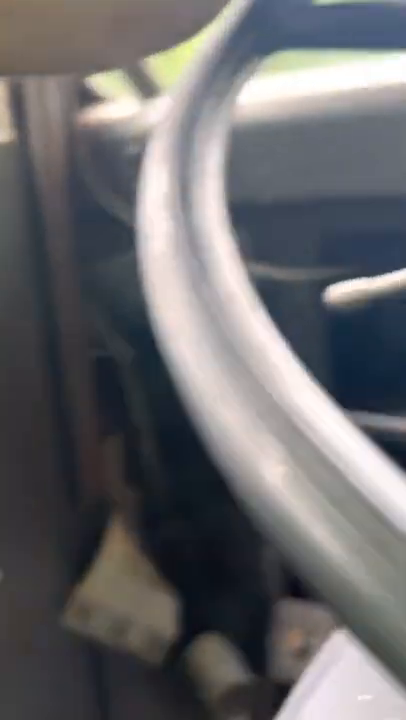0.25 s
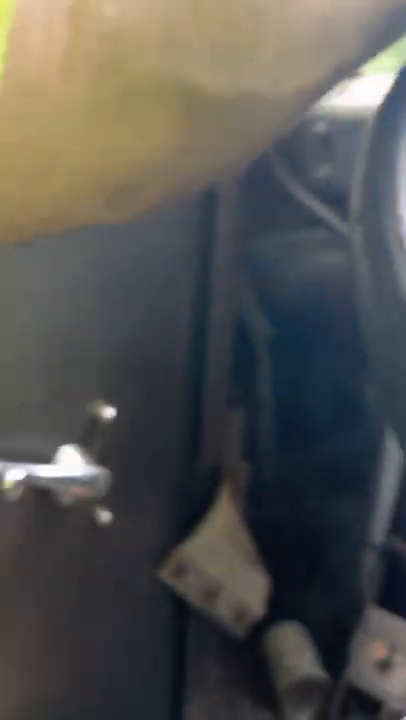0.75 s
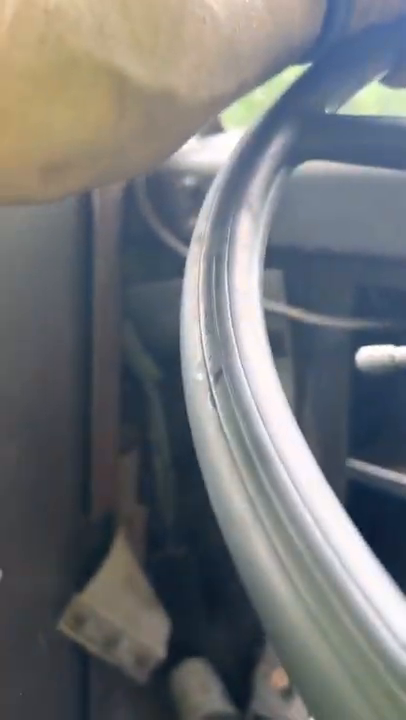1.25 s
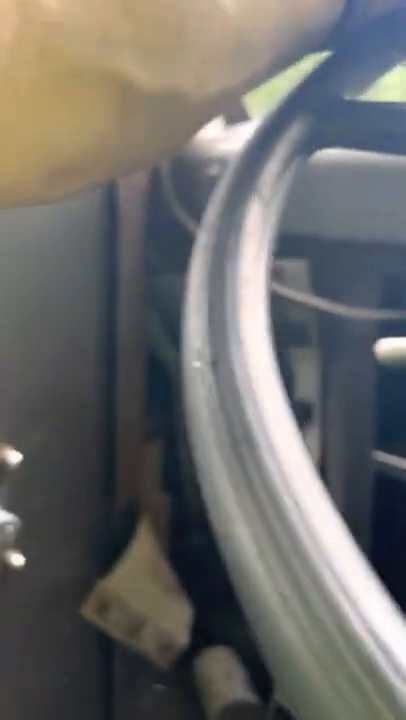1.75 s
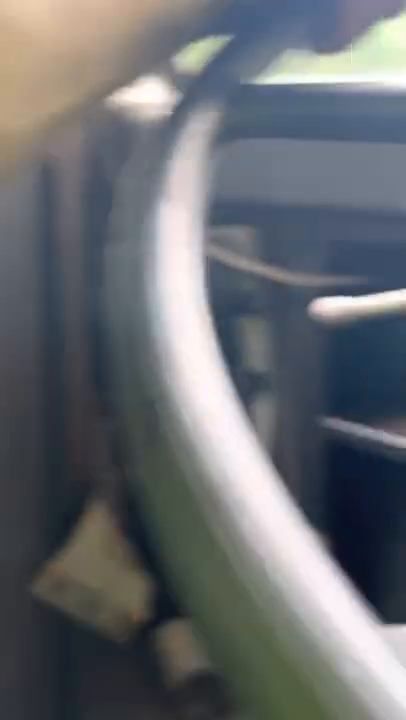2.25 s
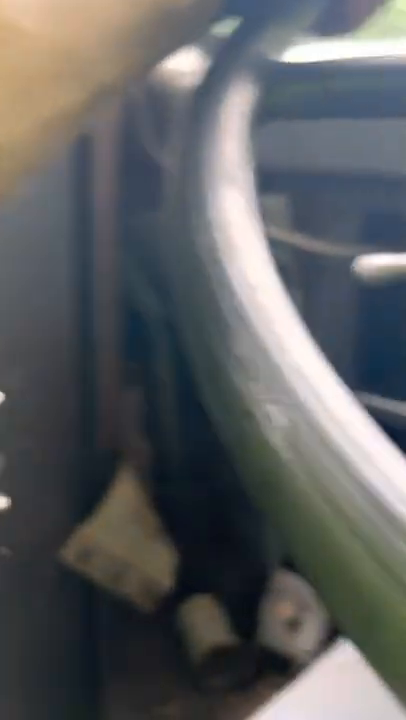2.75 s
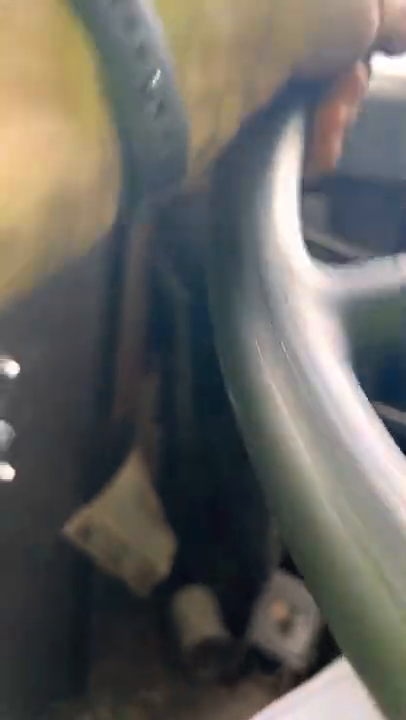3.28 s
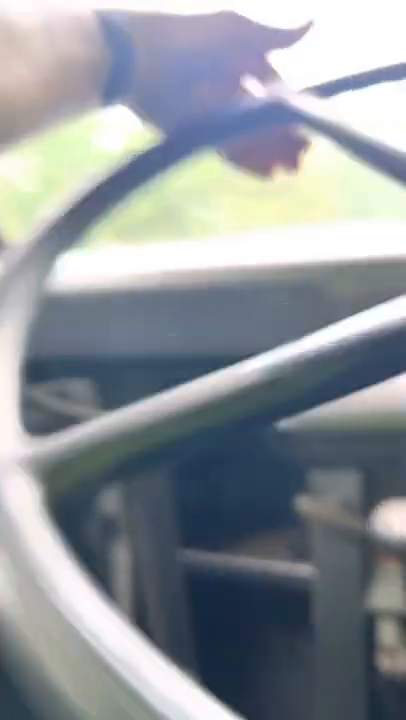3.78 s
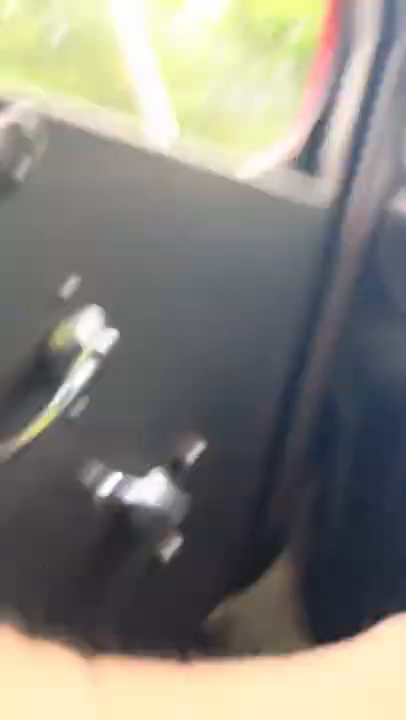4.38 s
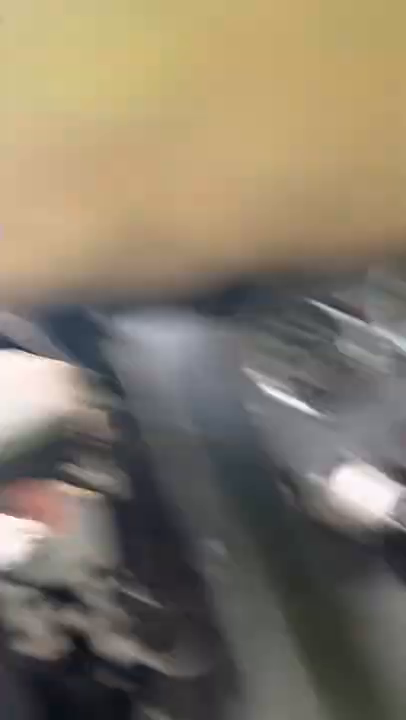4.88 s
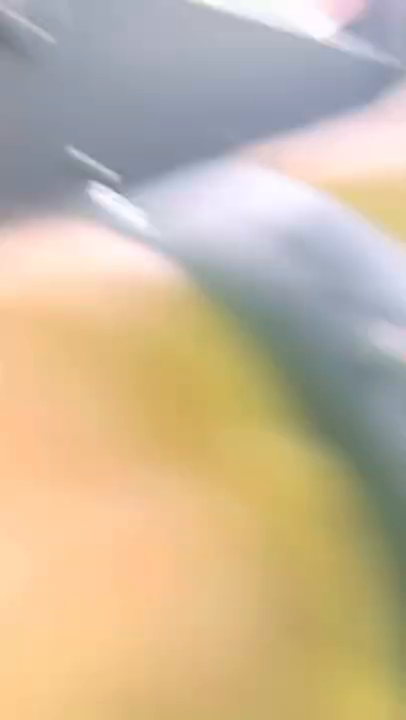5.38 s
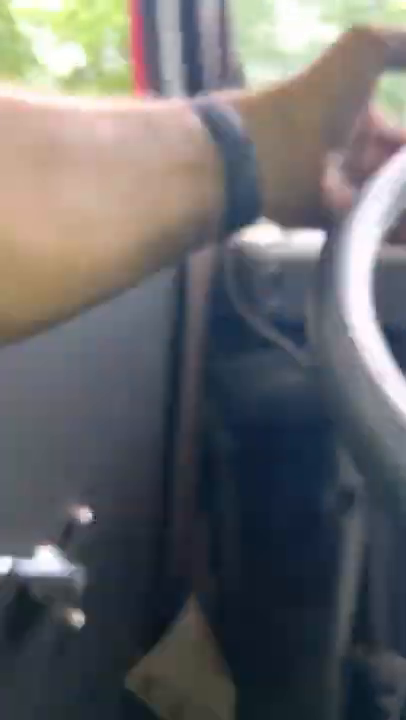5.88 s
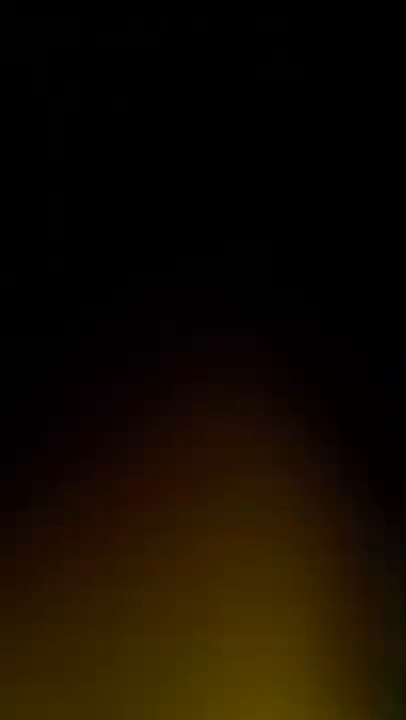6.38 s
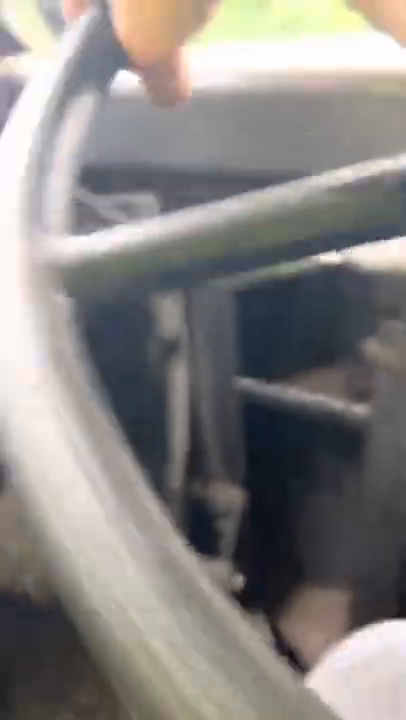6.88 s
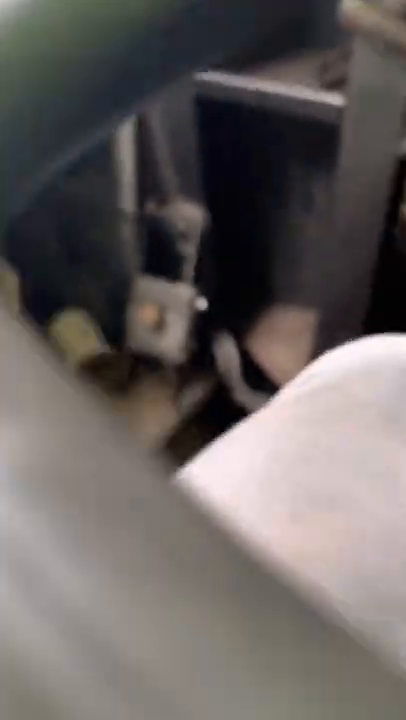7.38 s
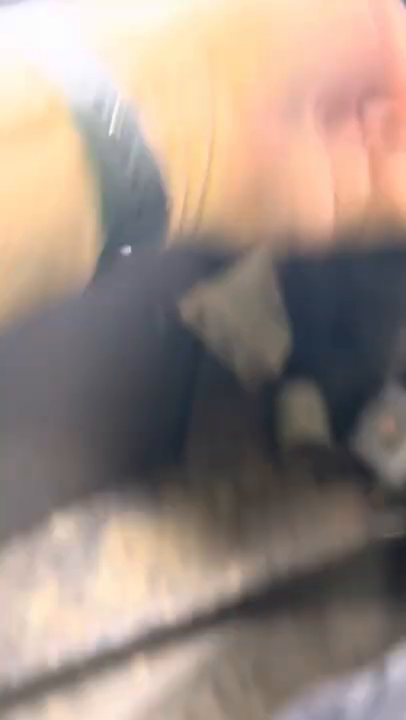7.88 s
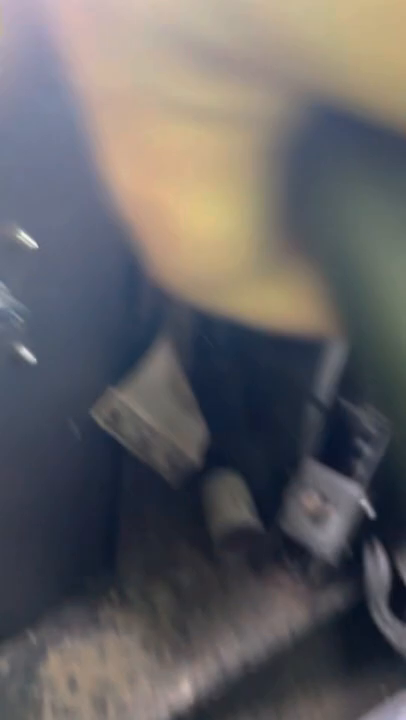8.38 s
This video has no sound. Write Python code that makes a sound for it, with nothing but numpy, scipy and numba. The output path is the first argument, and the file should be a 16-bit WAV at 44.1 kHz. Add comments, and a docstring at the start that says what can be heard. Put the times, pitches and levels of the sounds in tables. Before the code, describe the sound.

Close, boxy truck cab with muffled diesel drone and road rumble, no speech. Revs slide down, waver, and hold low and gritty for a few seconds under a faint breathy whistle. A small knock and tick, then a heavy thump on the phone, briefly push the level down. The engine pulls again, rising to a strong boom, with one sharp click late on before it holds steady.

```python
"""A six-cylinder diesel truck heard in its cab through a hand-held phone: revs fall, hold, then climb.
From the start, sines at engine orders boom, a pattern repeating each cycle growls, and filtered noise
gives clatter and road roar muffled by the panels. Then the turbo whistles as noise on a gliding carrier
and single orders sing out. Later, falling rings make knocks on the phone, whose gain control ducks, and
the body of a click; short noise bursts tick and squeak."""
import sys
import numpy as np
from scipy import signal
from scipy.fft import rfft, irfft
from scipy.io import wavfile
from scipy.ndimage import uniform_filter1d, minimum_filter1d, map_coordinates
from numba import njit

SR = 44100
rng = np.random.default_rng(int(sys.argv[2]) if len(sys.argv) > 2 else 0)


def unload_audio(sound):
    """Save the sound as a 16-bit wav file, at the path given as the first command line argument."""
    columns = np.transpose(np.atleast_2d(sound))
    # keep every value between -1 and 1, then stretch to whole-number steps
    steps = np.round(np.clip(columns, -1, 1) * 32767)
    wavfile.write(sys.argv[1], SR, steps.astype(np.int16))


N = 381024
T = np.arange(N) / SR
HZ = np.maximum(np.arange(N // 2 + 1) * SR / N, 1)

# crankshaft speed, three beats and six firings in a cycle: time_s, beat_hz
REVS = [(0.0, 43.13), (0.39, 41.58), (0.8, 38.14), (1.15, 34.6), (1.32, 34.36), (1.42, 34.61),
        (1.74, 34.37), (2.0, 31.88), (2.37, 32.07), (2.85, 31.35), (3.25, 31.37), (3.86, 31.72),
        (4.1, 32.44), (4.23, 33.43), (4.62, 34.02), (4.966, 38.09), (5.13, 38.8), (5.37, 40.7),
        (5.5, 41.93), (5.78, 44.17), (6.11, 46.53), (6.3, 47.5), (6.36, 47.97), (6.6, 48.63), (7.0, 48.61),
        (7.21, 49.61), (7.49, 48.51), (7.61, 47.63), (7.92, 48.3), (8.12, 46.24), (8.64, 47.77)]
START_BEATS = -.28

# boom before its wavering, octave and other orders also before the cab's path:
# time_s, firing_tone_db, octave_db, other_orders_db
BOOM_LEVELS = [(0.0, -21, -13, -42), (0.4, -23, -13, -39), (0.74, -27, -17.5, -32.5),
               (0.85, -23.5, -17, -39), (1.15, -37, -23, -27.5), (1.32, -31, -26, -26.5),
               (1.42, -23.5, -13, -21), (1.75, -23, -14, -18), (2.2, -24, -17, -22),
               (3.2, -24.5, -16.5, -22.5), (4.1, -21, -14.5, -21), (4.23, -16, -30, -19.5),
               (4.66, -12, -30, -19), (4.97, -12.5, -36, -27.5), (5.15, -12.5, -25, -19),
               (5.37, -10, -13.5, -24.5), (5.75, -8, -17.5, -20), (6.12, -7, -7, -18.5),
               (6.32, -8.5, -10.5, -18.5), (6.6, -9, -14, -22), (7.0, -11, -14, -26), (7.25, -12, -14, -23),
               (7.61, -13.5, -11, -23.5), (7.92, -11.5, -14.5, -21.5), (8.15, -12.5, -9, -26),
               (8.64, -12.5, -12.5, -24.5)]
# transmission of the cab for an order at its pitch: pitch_hz, gain_db
BOOM_PATH = [(95, 2), (115, 0.5), (126, -5), (140, -18.5), (152, -14), (168, -14), (190, -11.5),
             (212, -21.5), (240, -12), (265, -8.5), (288, -22.5), (330, -16), (380, -22.5), (415, -22),
             (460, -21.5), (540, -22), (600, -15), (640, -18), (700, -26.5), (850, -14.5), (950, -27)]
# other engine orders, besides the firing tone and its octave: beat_multiple
OTHER_ORDERS = [3, 5, 6, 7, 8, 9, 10, 11, 12, 13, 14, 15, 16, 19]
# relative strengths of these other orders: level_db
OTHER_STRENGTHS = [0.5, 0.5, 0, 0, -4, -2.5, -4.5, -7, -3, -3.5, -7.5, -1, -2, -8.5]
# left minus right of the firing tone, octave and other orders in turn: pan_db
BOOM_PAN = [-0.3, -1.8, -0.048, -1.3, -1.6, 0, -2, -2, -2, -2, -2, -1, -1, -1, -1, -1]
# jolts of the driveline that swell the orders other than firing tone and octave: centre_s, swell_db
JOLTS = [(1.55, 8), (1.7, 13), (1.8, 14), (1.915, 12.5), (2.04, 7.5), (5.11, 6)]
JOLT_S, JOLT_GAP_DB = 0.034, -4.5  # the gap is four times as long as the swell
JOLT_TOP_HZ = 300  # higher orders swell less
# sudden drops of the boom: start_s, depth_db, return_s
DIPS = [(4.675, -11, 0.26), (6.328, -2, 0.41)]
WAVER_DB = 0.179  # per beat multiple: higher orders are more broken
BOOM_HZ, BOOM_Q, PANEL_HZ, PANEL_Q = 110, 1.8, 151, 5.5

# repeating pattern against the noise: time_s, gain_db
PATTERN_SHARE = [(0, 0), (1.2, 1), (1.6, 6), (1.95, 6), (2.3, 5.5), (4.2, 5), (4.7, 2), (5.3, 3),
                 (6.3, 3.5), (7, 2), (8.64, 2)]
# orders of the full cycle that are raised or lowered in the pattern: cycle_order, gain_db
STRONG_ORDERS = [(5, -2), (7, -8), (8, -8), (10, -7), (11, -5), (13, -4), (14, -8), (16, -5), (17, -7),
                 (20, 4), (22, 3), (23, 3), (32, 4), (35, 7), (38, 7), (44, 5), (50, 7), (56, 7), (58, 8),
                 (60, 8), (63, 6), (68, 9), (75, 7), (78, 6), (82, 8), (91, 7), (94, 8), (101, 8), (104, 7),
                 (113, 7), (120, 7), (136, 7), (150, 7), (168, 7)]
# above the broken order the pattern changes more than it repeats
PATTERN_TOP_HZ, DRIFT, BROKEN_ORDER = 2400, .75, 40

# noise through the panels, before its colour:
# time_s, low_roar_db, drone_db, clatter_db, rattle_db, hiss_db
ROAR_LEVELS = [(0.0, -29.5, -35.5, -49, -52, -63), (0.35, -32, -36.5, -48.5, -52.5, -60),
               (0.75, -32, -37.5, -47, -53, -57.5), (1.1, -30.5, -34, -51, -52, -63),
               (1.45, -30.5, -42, -43, -50, -62.5), (1.82, -25, -36, -39.5, -47.5, -57.5),
               (1.97, -29.5, -33.5, -42.5, -46, -58.5), (2.85, -34.5, -31.5, -42.5, -46.5, -58),
               (3.8, -35, -32.5, -38, -42.5, -55), (4.12, -29, -31.5, -40.5, -43.5, -56),
               (4.6, -28.5, -27, -37.5, -46, -55), (4.74, -32.5, -29.5, -36.5, -42.5, -51),
               (5.22, -27, -28.5, -36.5, -45, -53), (5.63, -23.5, -23, -36, -45.5, -51.5),
               (5.93, -24, -23, -33.5, -41, -49), (6.3, -23.5, -27, -36, -42, -50.5),
               (6.55, -27, -30.5, -38.5, -46, -51.5), (6.87, -22.5, -30, -32.5, -44, -51.5),
               (7.05, -26, -28, -38, -44, -53), (7.3, -24, -28.5, -38, -43, -52.5),
               (7.6, -29.5, -26, -37.5, -43, -55.5), (7.72, -31, -27.5, -37, -43.5, -54),
               (8.06, -26.5, -30, -37, -44, -54.5), (8.64, -31.5, -26, -39.5, -45, -54.5)]
# pitches at which the rumble and the five levels above apply: pitch_hz
ROAR_PITCHES = [70, 300, 700, 1500, 2800, 8000]
RUMBLE_DB, RUMBLE_SLOPE = -35.5, 0.17  # the rumble at a low roar of -30 dB, dB per dB
# regions of the roar that swell or thin for a while: centre_s, length_s, centre_hz, change_db
SWELLS = [(0.503, 0.92, 376, 2.5), (.5, 0.54, 610, 2), (1.55, 0.25, 890, 8.5), (1.623, 0.36, 1250, -3),
          (1.707, 0.31, 630.4, -6.5), (2.504, 0.8, 433, -6.5), (3.82, .25, 1000, 3.5),
          (4.41, 0.37, 400.3, -5), (4.86, 0.22, 1091, 2.5), (5.221, 0.27, 473.6, 5.5),
          (5.255, 0.093, 885, 6.5), (5.9, 0.53, 519.3, 0), (6.45, 0.093, 2260, 6.5), (6.197, .4, 1480, -1),
          (7.446, 0.55, 342.9, -5), (7.42, 0.21, 1250, 4.5), (7.45, .28, 1770, 2.5),
          (7.56, 0.36, 780, -3.5), (7.497, 0.18, 2303, -7), (7.604, 0.54, 465.8, 4), (8.5, 0.16, 973, 0)]
SWELL_OCTAVES = 0.36
# flicker of all bands together, of each band, of the treble; throb with the engine
SHARED_DB, OWN_DB, TREBLE_DB, THROB_DB = .5, 1.1, 1.66, 2.2
# fine colour of the cab in the mid signal: pitch_hz, gain_db
MID_COLOUR = [(25, -22.5), (45, -4.5), (110, 5), (160, -3), (300, -5), (500, -6.5), (700, -8), (1100, -3.5),
              (1900, 0), (3300, 0.5), (3700, -1.5), (4500, 3), (4850, -2.5), (5200, -3), (5700, 1),
              (8000, 2), (10500, -7), (12300, -13), (12900, -36.5)]
# colour of the side signal: pitch_hz, gain_db
SIDE_COLOUR = [(25, -44.5), (60, -31.5), (170, -14), (350, -12), (520, -8), (800, -1.5), (1050, 0),
               (1400, -5.5), (1850, -8.5), (2400, -3.5), (3100, -0.5), (3800, -6), (5100, 5.5), (5900, -11),
               (6500, -20.5), (7900, -11), (9300, -3.5), (10500, -7), (12200, 0.5), (13500, -3),
               (15700, -14.5)]
# share of the side tied to the mid: pitch_hz, in_phase_ratio, quadrature_ratio
TIED = [(100, -.35, -.2), (340, -0.46, 0.005), (700, -0.015, -0.48), (1050, -0.28, -0.31),
        (1400, -0.13, -0.088), (2000, .03, -.14), (3100, -.03, -.1), (4500, .05, -.43), (5500, .03, .02),
        (6500, .07, -.42), (8500, .01, -.62), (12000, -.01, -.42)]
# resonances of the cab: pitch_hz, width_hz, gain_db
CAB_RESONANCES = [(70, 26, 5.2), (117, 3.9, 1.8), (249, 2.6, 1.1), (328, 16.6, 5.7), (366.2, 15.7, 6.5),
                  (592, 33, 5.3), (751, 14, 5.9), (961, 50, 2.3), (1051, 61, 5.1), (1221, 28, 3.3),
                  (1555, 33, 4.6), (1804, 26, 4.5), (2178, 24, 4.2)]

# turbo whistle, two stretches on boost, before its flutter: time_s, pitch_hz, level_db
TURBO = [
    [(1.3, 4150, -68), (1.5, 4150, -54), (2.3, 4310, -59), (3.05, 4390, -53.5), (3.7, 4597, -57),
     (4.23, 4880, -54.5), (4.55, 5110, -53.5), (5.05, 5400, -49.5), (5.5, 5482, -48), (5.9, 5440, -44),
     (6.3, 5268, -49.5), (6.8, 5100, -55.5)],
    [(7.3, 4570, -62), (7.6, 4640, -53.5), (8.1, 4860, -56), (8.64, 4730, -54.5)],
]
TURBO_WIDTH_HZ, FLUTTER_DB = 330, 1.6

# orders that sing out for a moment: centre_s, half_length_s, cycle_order, level_db
SINGING_ORDERS = [(1.47, 0.1, 21, -32.5), (1.8, 0.15, 20, -27.5), (1.76, 0.1, 22, -33),
                  (1.8, 0.13, 37, -30), (1.51, .1, 51, -39), (4.8, .4, 21, -29), (5.35, 0.25, 45, -34),
                  (6.05, 0.34, 39, -33), (6.13, .12, 68, -35.5), (6.7, .45, 22, -32.5), (7.1, .4, 38, -43),
                  (8.3, .35, 39, -39), (8.45, 0.21, 62, -39.5)]
SINGING_WAVER_DB, SINGING_WAVER_TURNS = 2.5, .12

# falling rings of the knocks, their overtone and the body of the click, before gain control:
# start_s, peak_db, start_hz, end_hz, glide_s, rise_s, t60_s
RINGS = [(6.3895, -15.5, 2160, 1000, 0.0018, 0.00043, .018),
         (6.3895, -13.5, 481, 328, 0.0038, 0.0011, .035), (3.726, -7.5, 322, 100, 0.0071, 0.0018, .13),
         (4.2637, 14, 171, 63, 0.018, 0.004, 0.048), (4.2630, 0, 494, 480, 0.0063, 0.0045, 0.018)]
# ticks and short squeaks: start_s, level_db, centre_hz, width_hz, length_s
TICKS = [(3.729, -32.5, 4620, 280, 0.075), (4.168, -27.5, 1959, 600, 0.027),
         (4.172, -38, 5500, 6000, 0.0039), (4.775, -39, 6640, 503, 0.029), (5.801, -32, 5200, 900, 0.031),
         (6.3896, -13.5, 6700, 3560, 0.0016), (6.39, -17.5, 2600, 2400, 0.0025)]

LIMIT_DB, ATTACK_S, AHEAD_S, RELEASE_DB_S = -.7, .0008, .001, 49
TOP_HZ = 15800


def undb(db):
    """Decibel law: a level in dB becomes an amplitude gain."""
    return 10 ** (np.asarray(db) / 20)


def curves(tables):
    """Linear interpolation in time: columns of joined tables, one value a sample."""
    s, *columns = np.vstack(tables).T
    return [np.interp(T, s, c) for c in columns]


def along(points, column=1):
    """Interpolation in pitch: a table column read on a log-frequency axis."""
    table = np.transpose(points)
    return np.interp(np.log(HZ), np.log(table[0]), table[column])


def walk(rate):
    """Band-limited fluctuation: random levels held 1 / rate s and slewed twice; spread near 1."""
    k = int(SR / rate)
    steps = np.repeat(rng.standard_normal(N // k + 1), k)
    return 1.3 * uniform_filter1d(uniform_filter1d(steps, k), k)[:N]


def unit(x):
    """Normalisation to rms 1."""
    return x / np.sqrt(np.mean(x ** 2))


def boom_levels(beat_hz):
    """Transmission: the cab filters all but the firing tone, jolts swell the other orders, dips lower all."""
    firing, octave, other = curves([BOOM_LEVELS])

    def path(order):
        return np.interp(order * beat_hz, *np.transpose(BOOM_PATH))

    swell = 0
    for s, db in JOLTS:
        swell = swell + db * np.exp(-((T - s) / JOLT_S) ** 2)
        swell = swell + JOLT_GAP_DB * np.exp(-((T - s) / (4 * JOLT_S)) ** 2)
    dip = sum(db * (T > s) * np.clip(1 - (T - s) / back, 0, 1) for s, db, back in DIPS)
    dip = uniform_filter1d(dip, SR // 100)
    others = []
    for k, db in zip(OTHER_ORDERS, OTHER_STRENGTHS):
        jolted = swell / (1 + (k * beat_hz / JOLT_TOP_HZ) ** 2)
        others.append(other + db + path(k) + jolted)
    return np.array([firing, octave + path(4), *others]) + dip


def resonance_lag(ratio, q):
    """Forced oscillation: phase lag in radians of a resonator driven at a ratio of its own pitch."""
    return np.arctan2(ratio / q, 1 - ratio ** 2)


def boom(beat_hz, turns):
    """Harmonic synthesis: wavering engine orders lag behind cab and panel resonances."""
    out = 0
    # two firings a beat: multiple 2 is the firing tone, 4 its octave
    for k, db, pan_db in zip([2, 4] + OTHER_ORDERS, boom_levels(beat_hz), BOOM_PAN):
        lag = resonance_lag(k * beat_hz / BOOM_HZ, BOOM_Q)
        lag = lag + 2 * resonance_lag(k * beat_hz / PANEL_HZ, PANEL_Q)
        lag = lag + 2 * np.pi * rng.random() * (k > 6)  # high orders arrive by unrelated paths
        gain = np.sqrt(2) * undb(db + WAVER_DB * k * walk(14))
        line = gain * np.cos(2 * np.pi * k * turns - lag + 0.2 * walk(14))
        out = out + line * undb(np.array([[pan_db], [-pan_db]]) / 2)
    return out


def cycle_pattern(turns):
    """Periodicity: valves, pump and unequal cylinders repeat a slowly changing pattern; its spectrum."""
    orders = np.arange(1025)
    size = 1. * (orders < 220)
    # the lowest orders and those of the boom stay out
    size[[0, 1, 2, 6, 9, 12, 15, 18, 21, 24, 27, 30, 33, 36, 39, 42, 45, 48, 57]] = 0
    for order, db in STRONG_ORDERS:
        size[round(order)] *= undb(db)
    steady = np.exp(2j * np.pi * rng.random(len(orders))) / np.hypot(1, orders / BROKEN_ORDER)
    change = rng.standard_normal((110, len(orders))) + 1j * rng.standard_normal((110, len(orders)))
    patterns = irfft(size * (steady + DRIFT * change), axis=1)
    # read across the patterns with time and around each with the cycle
    place = T / T[-1] * (len(patterns) - 1)
    angle = turns / 3 % 1 * (patterns.shape[1] - 1)
    x = map_coordinates(patterns, [place, angle], order=1)
    # the orders fill only the low part of the band, so they are scaled to the density of white noise
    density = np.sqrt(2700 / (SR / 2))
    return rfft(unit(x) * density * undb(curves([PATTERN_SHARE])[0]))


def cab():
    """Resonance: gain added by the modes of the cab."""
    return undb(sum(db / (1 + (2 * (HZ - hz) / width) ** 2) for hz, width, db in CAB_RESONANCES))


def roar_levels():
    """Interpolation: six bands from rumble to hiss; the rumble follows the low roar more weakly."""
    low, *upper = curves([ROAR_LEVELS])
    rumble = RUMBLE_DB + RUMBLE_SLOPE * (low + 30)
    return [rumble, low, *upper]


def roar(turns):
    """Filtered noise: overlapping bands carry noise and cycle pattern; the treble throbs most."""
    levels = roar_levels()
    white, other = (rfft(rng.standard_normal(N)) for _ in range(2))
    white = white + cycle_pattern(turns) / (1 + (HZ / PATTERN_TOP_HZ) ** 4)
    tied = along(TIED) + 1j * along(TIED, column=2)
    untied = np.sqrt(np.maximum(1 - np.abs(tied) ** 2, 0))
    mid = white * cab() * undb(along(MID_COLOUR))
    side = (tied * white + untied * other) * cab() * undb(along(SIDE_COLOUR))
    # once a beat and once a firing
    throb = 0.19 * np.cos(2 * np.pi * turns) + .5 * np.cos(4 * np.pi * turns)
    out, shared = 0, walk(11)
    for hz in 25 * 2 ** np.arange(0, 9.6, .5):
        window = np.cos(np.pi * np.clip(np.log2(HZ / hz), -.5, .5)) ** 2
        place = np.interp(np.log(hz), np.log(ROAR_PITCHES), np.arange(len(ROAR_PITCHES)))
        k = min(int(place), len(ROAR_PITCHES) - 2)
        db = levels[k] + (place - k) * (levels[k + 1] - levels[k])
        # levels are per octave, so the density falls with the centre
        db = db + 10 * np.log10(SR / 2 / hz)
        db = db + SHARED_DB * shared + OWN_DB * walk(14)
        db = db + TREBLE_DB * min(hz / 4000, 1) * walk(25)
        db = db + THROB_DB * min(hz / 900, 1) * throb
        for s, length, centre_hz, change_db in SWELLS:
            if .5 < hz / centre_hz < 2:
                octaves = np.log2(hz / centre_hz)
                db = db + change_db * np.exp(-((T - s) / length) ** 2 - (octaves / SWELL_OCTAVES) ** 2)
        m, s = irfft(mid * window, N), irfft(side * window, N)
        out = out + undb(db) * np.array([m + s, m - s])
    return out


def turbo(turns):
    """Modulation: slow noise on a gliding carrier makes a narrow, breathy whistle, silent off boost."""
    hz, db = curves(TURBO)
    first, second = TURBO
    on = (T > first[0][0]) & ((T < first[-1][0]) | (T > second[0][0]))
    db = db + 2.8 * walk(70) + FLUTTER_DB * walk(28)
    # pulsing once a beat and once a cycle
    db = db + 1.0 * np.cos(2 * np.pi * turns) + 2.2 * np.cos(2 * np.pi * turns / 3 + 1.5)
    gain = uniform_filter1d(1. * on, SR // 10) * undb(db)
    carrier = np.exp(2j * np.pi * np.cumsum(hz * (1 + 0.006 * walk(30))) / SR)
    b, a = signal.butter(2, TURBO_WIDTH_HZ / SR)

    def breath():
        noise = rng.standard_normal(N) + 1j * rng.standard_normal(N)
        return unit(np.real(carrier * signal.lfilter(b, a, noise)))

    m, s = breath(), breath()
    return gain * np.array([m + 0.91 * s, m - 0.5 * s])


def singing_orders(turns):
    """Order tones: a few multiples of the full cycle sing out for a while as the load changes."""
    out = 0
    for s, length, order, db in SINGING_ORDERS:
        gain = np.sqrt(2) * undb(db + SINGING_WAVER_DB * walk(12))
        fade = np.exp(-((T - s) / length) ** 4)
        phase = round(order) * turns / 3 + rng.random() + SINGING_WAVER_TURNS * walk(12)
        out = out + gain * fade * np.cos(2 * np.pi * phase)
    return out


def falling_rings():
    """Damped oscillation: the rings of knocks and click fall in pitch and die fast."""
    out = np.zeros(N)
    for s, db, start_hz, end_hz, glide, rise, t60 in RINGS:
        t = np.maximum(T - s, 0)
        hz = end_hz + (start_hz - end_hz) * np.exp(-(t / glide) ** 2)
        shape = (1 - np.exp(-t / rise)) ** 3 * np.exp(-np.log(1000) * t / t60)
        ring = np.sin(2 * np.pi * np.cumsum(hz * (t > 0)) / SR)
        out -= undb(db) * shape / shape.max() * ring
    return out


def ticks():
    """Transient excitation: short bursts of band-passed noise."""
    out = np.zeros((2, N))
    for s, db, hz, width_hz, length in TICKS:
        i, n = int(s * SR), int(4 * length * SR)
        band = [max(hz - width_hz / 2, 50), hz + width_hz / 2]
        sos = signal.butter(2, band, "band", fs=SR, output="sos")
        # the first 1024 samples let the filter settle
        m, d = signal.sosfilt(sos, rng.standard_normal((2, n + 1024)))[:, -n:]
        t = np.arange(n) / SR / length
        shape = t * np.exp(1 - 3 * t) * 3
        out[:, i:i + n] += undb(db) * shape * np.array([m + .5 * d, m - .5 * d]) / np.std(m) / 2
    return out


def scene():
    """Superposition: engine, roar, whistle, falling rings and ticks add at the phone."""
    beat_hz = curves([REVS])[0]
    turns = START_BEATS + np.cumsum(beat_hz) / SR  # engine phase in beats
    engine = boom(beat_hz, turns) + singing_orders(turns)
    return engine + roar(turns) + turbo(turns) + falling_rings() + ticks()


@njit
def follow(x, top, attack, release):
    """Peak following: quick to rise, falling at a steady dB rate, never under the limit."""
    e, out = top, np.empty(len(x))
    for i in range(len(x)):
        if x[i] > e:
            e = e + attack * (x[i] - e)
        else:
            e = max(e * release, top)
        out[i] = e
    return out


def record(dry):
    """Compression: gain control ducks after overloads, peaks are rounded, the top is cut."""
    top = float(undb(LIMIT_DB))
    peak = -minimum_filter1d(-np.abs(dry).max(axis=0), int(2 * AHEAD_S * SR))
    envelope = follow(peak, top, 1 / (ATTACK_S * SR), float(undb(-RELEASE_DB_S / SR)))
    ducked = dry * top / envelope
    rounded = ducked / (1 + np.abs(ducked / .98) ** 6) ** (1 / 6)
    return signal.sosfilt(signal.ellip(8, .2, 70, TOP_HZ, fs=SR, output="sos"), rounded)


dry = scene()
out = record(dry)
unload_audio(out)
```